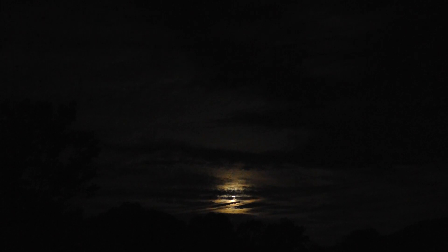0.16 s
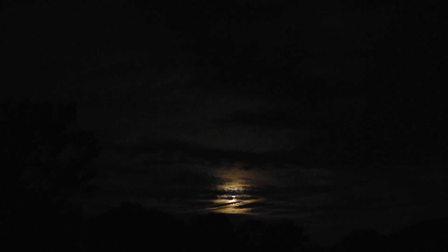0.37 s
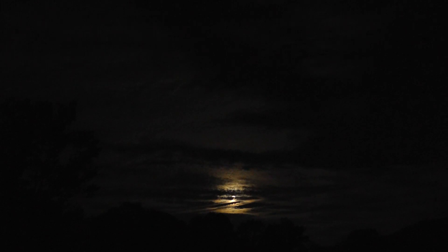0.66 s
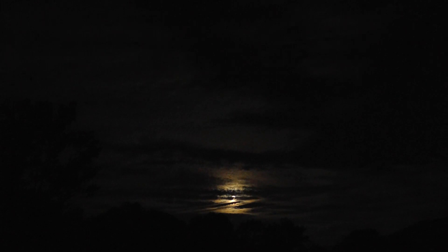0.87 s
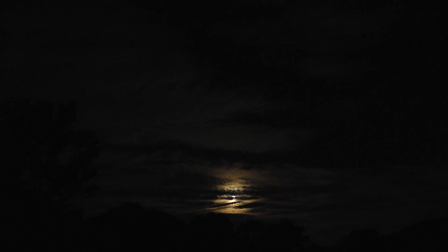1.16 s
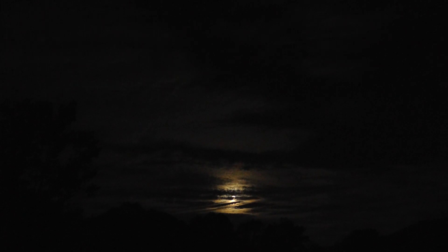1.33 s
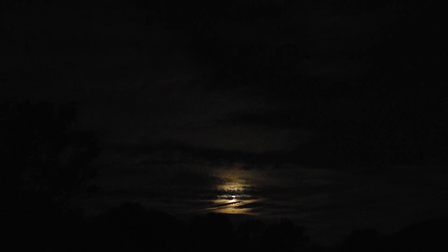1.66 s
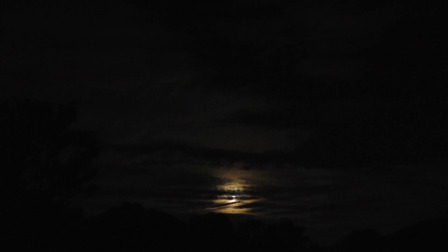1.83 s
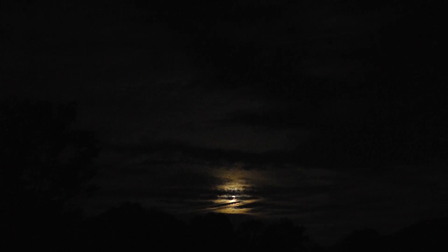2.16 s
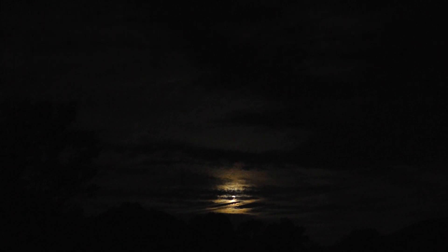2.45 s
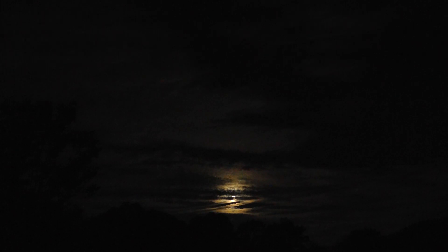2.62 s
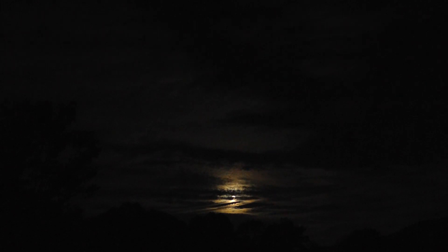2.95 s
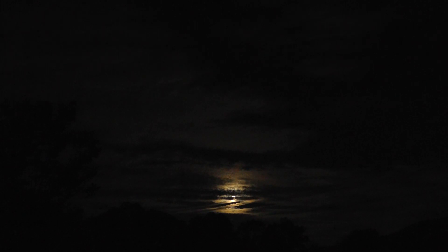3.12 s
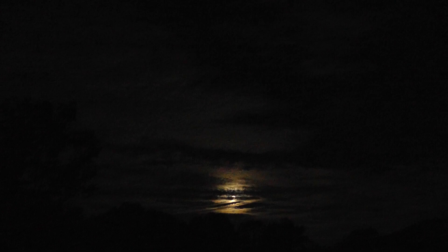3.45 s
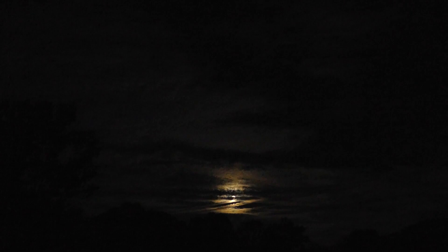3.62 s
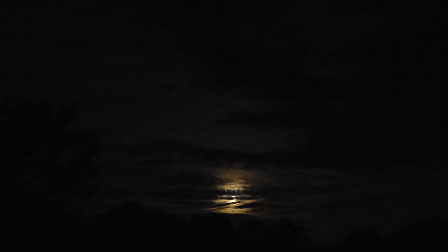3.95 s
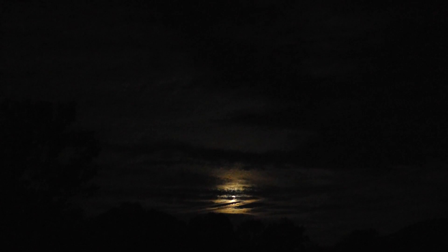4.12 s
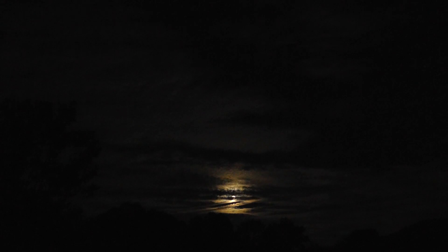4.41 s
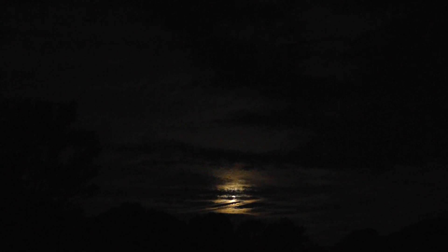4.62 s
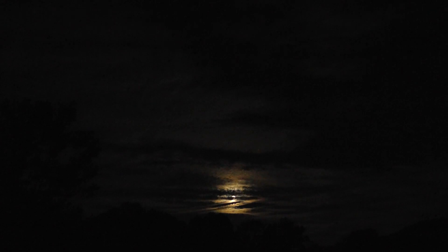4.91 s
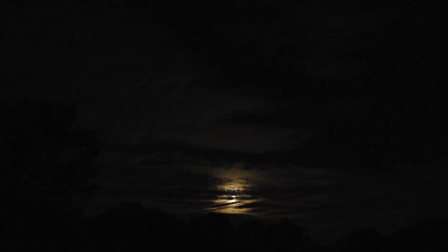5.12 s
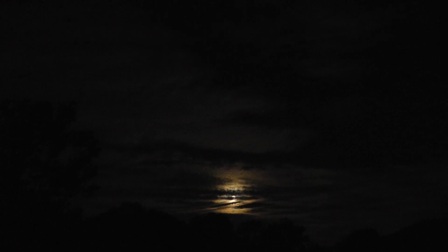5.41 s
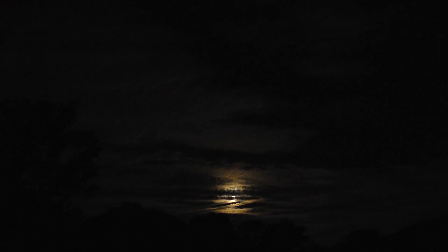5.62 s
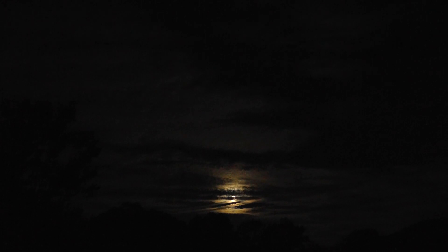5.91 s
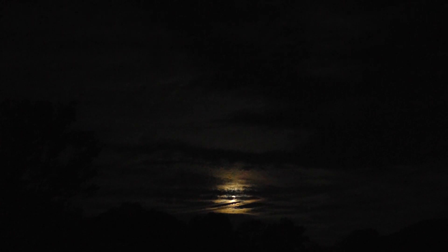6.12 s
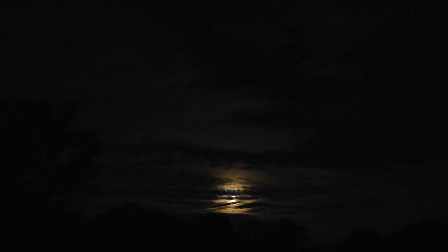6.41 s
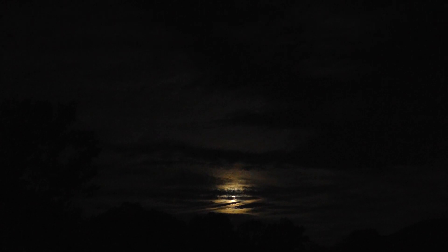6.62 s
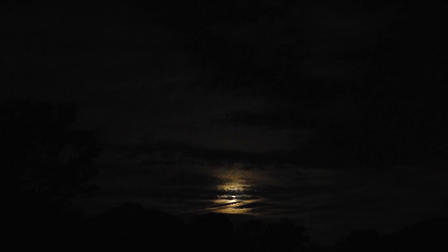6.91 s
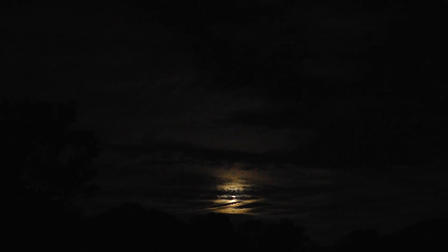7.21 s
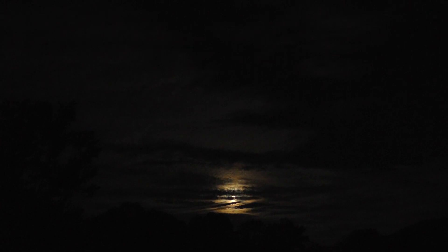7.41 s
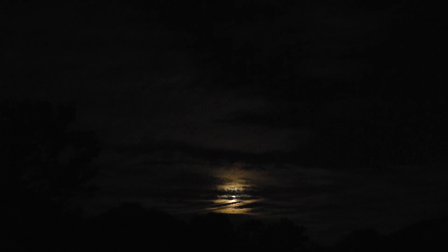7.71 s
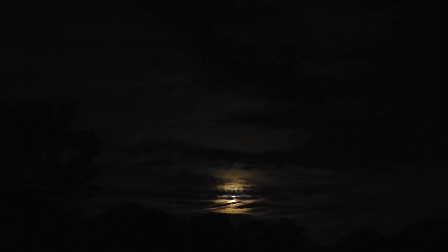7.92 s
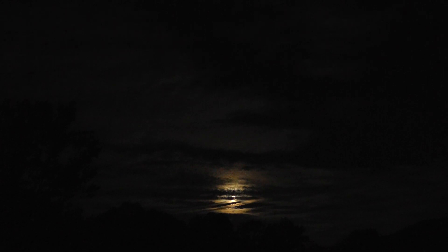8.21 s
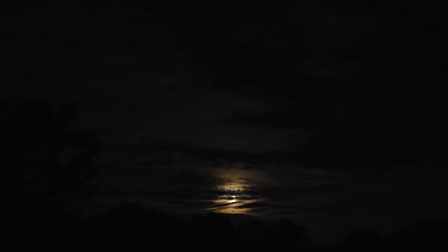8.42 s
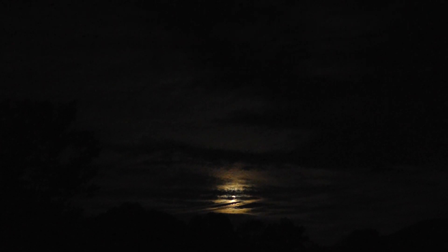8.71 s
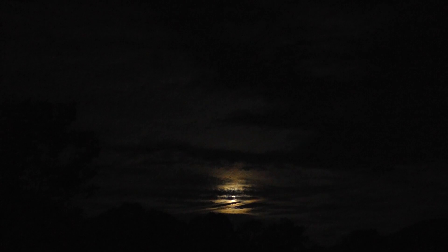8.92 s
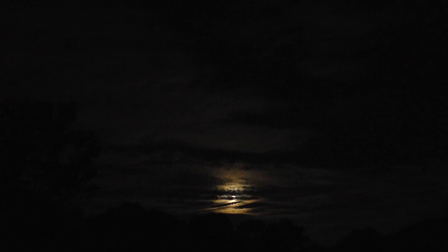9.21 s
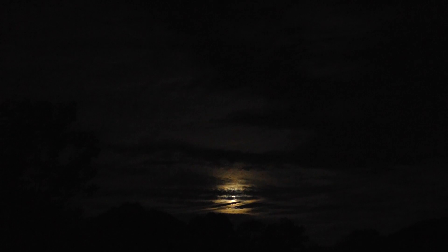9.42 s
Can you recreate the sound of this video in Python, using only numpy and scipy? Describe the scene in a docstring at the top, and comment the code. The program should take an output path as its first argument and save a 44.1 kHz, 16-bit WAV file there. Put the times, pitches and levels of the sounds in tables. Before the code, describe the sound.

Steady layers of distant crickets shimmer from mid-high to very high pitch, with dry katydid buzzing on top. Brief, purring trills from nearer crickets overlap irregularly throughout. One short, far dog bark with a faint echo comes early; from four seconds a brighter, closer buzz thickens the treble. Four quick rasps follow around nine seconds. Dark open field with trees, soft low rumble and faint hum, stationary stereo microphone.

```python
"""Crickets and katydids in a field at night

Five kinds of far crickets, as stroke clicks ringing wing resonances, merge into steady bands; nearer ones
trill in bouts of short gliding tones. Katydids buzz in the treble as noise gated at the stroke rate, one
joining close by, and others rasp in short noise swells. A far dog barks once, with harmonics and throat
noise; a haze of insects, distant traffic and a faint hum are shaped noise and narrow resonances.
"""
import sys
import numpy as np
from scipy import signal
from scipy.fft import rfft, irfft, next_fast_len
from scipy.io import wavfile

SR = 44100
rng = np.random.default_rng(int(sys.argv[2]) if len(sys.argv) > 2 else 0)


def store_wav(level_fs):
    """Save 16-bit WAV to argv[1]."""
    pcm = np.round(np.clip(np.atleast_2d(level_fs), -1, 1) * 32767)
    wavfile.write(sys.argv[1], SR, pcm.T.astype(np.int16))


N = 421596   # samples in the scene

# Spectra below give relative level per Hz. Likeness is left-right correlation: 1 equal, -1 opposed.
# Balances and pans are left-right level differences: positive values favour the left.

# night air and far traffic: spectrum [f/Hz, level/dB]
AIR_SPECTRUM = [(20, -40), (32, -22), (48, -6.5), (60, -1.5), (110, -0.5), (200, 0.5), (400, -2.5),
                (700, -3), (900, -2.5), (1200, -7.5), (1450, -8), (1750, -14.5), (2500, -22)]
# night air and far traffic: course of the level [t/s, level/dB]
AIR_LEVEL_COURSE = [(0, -50.5), (1.7, -50.5), (2.0, -49), (4.0, -49), (5.3, -50.5), (6.45, -49.5),
                    (7.3, -50.5), (9.56, -50.5)]
# night air and far traffic: likeness of the two sides [f/Hz, likeness/1]
AIR_LIKENESS = [(60, 0.16), (130, 0.23), (290, -0.19), (450, -0.39), (750, -0.12), (1200, -0.29),
                (1500, 0.11)]
# night air and far traffic: left-right balance [f/Hz, level difference/dB]
AIR_BALANCE = [(60, -1), (110, -7.0), (200, -5.5), (380, 0.0), (700, -4.5), (1290, -2.5)]
# wavering hum lines [f/Hz, resonance width/Hz, level/dB]
HUM_LINES = [(118.2, 3.2, -63), (170.8, 10.3, -65.5), (237.4, 4.5, -63.5), (334.4, 9.2, -66.5),
             (1820, 1.7, -72.5)]

# countless insects too far to tell apart: spectrum [f/Hz, level/dB]
HAZE_SPECTRUM = [(1700, -24.5), (2000, -7.5), (2520, 1.5), (3050, -12), (3700, -5), (4050, -13),
                 (4450, -4.5), (5350, -2.5), (6500, 3), (8500, -11), (11000, -40)]
# insect haze: likeness of the two sides [f/Hz, likeness/1]
HAZE_SIDE_LIKENESS = [(2000, 0.3), (4000, 0.86), (6500, 1), (8000, 0.084)]
HAZE_DB = -44

# far crickets, one row a kind [f/Hz, pitch spread/Hz, wing resonance width/Hz, stroke rate/(1/s),
# echo share of energy/1, pan/dB, mean level/dB]
FAR_CRICKET_KINDS = [(2178, 57, 90, 45, 0.52, 2, -51), (2802, 68, 124, 55, 0.31, 5, -43.5),
                     (3330, 110, 200, 50, 0.55, 1.5, -53.5), (6015, 182, 310, 60, 0.18, 0.5, -42.5),
                     (4950, 207, 92, 47, 0.2, 1, -50.5)]

# far katydids: wing spectrum [f/Hz, level/dB]
FAR_WING_SPECTRUM = [(7500, -44), (8600, -10.5), (9600, 1), (10300, -1), (11500, 0), (12900, 2.5),
                     (14800, 1.5), (15300, 0.5), (16000, -11)]
# far katydids: course of the level [t/s, level/dB]
FAR_BUZZ_LEVEL = [(0, -48), (2.0, -48.5), (2.4, -49), (4.0, -48.5)]
# lower katydid: wing spectrum [f/Hz, level/dB]
LOW_WING_SPECTRUM = [(6000, -16), (6500, 3), (7000, 4), (7500, 1), (8000, -7), (8600, -43), (9500, -32.5)]
LOW_BUZZ_DB = -52.5
# close katydid: wing spectrum [f/Hz, level/dB]
CLOSE_WING_SPECTRUM = [(8000, -26), (9600, -8), (10500, -13), (11500, -6), (12600, -4), (13500, -1),
                       (14800, -9), (15300, -6), (16000, -18)]
# close katydid, speeding up as it warms [t/s, mean stroke rate/(1/s), level/dB]
CLOSE_BUZZ_COURSE = [(4.04, 146, -80), (4.1, 146, -52), (4.2, 146.2, -46), (4.3, 148, -43), (5.5, 150, -43),
                     (6.5, 151.7, -43), (8.2, 152.2, -42.5), (9.56, 155, -43)]
# close katydid: likeness; sound from the side turns in phase with pitch [f/Hz, likeness/1]
CLOSE_SIDE_LIKENESS = [(8500, -0.98), (13000, -0.58), (14300, -.2), (15500, .4)]

# trill bouts of the nearer crickets, before the scatter between strokes
# [start t/s, length/s, first f/Hz, last f/Hz, level/dB]
TRILL_BOUTS = [(0, 0.24, 4840, 4920, -42), (0.123, 0.72, 5060, 5070, -46), (0.692, .36, 4800, 4800, -43),
               (0.784, 0.22, 4940, 4990, -43), (0.843, 0.216, 5050, 5140, -41),
               (1.155, .25, 4980, 4870, -50), (1.432, 0.34, 4810, 4920, -39.5),
               (1.6, 0.24, 4930, 5120, -46), (1.952, 0.4, 4950, 5000, -47), (2.033, 0.23, 5060, 5130, -43),
               (2.419, 0.26, 4840, 4900, -47), (2.803, 0.41, 4860, 4960, -41.5),
               (3.048, .21, 5100, 5130, -46), (3.391, 0.66, 4810, 4920, -46),
               (3.617, 0.21, 5130, 5110, -47), (4.074, 0.3, 4860, 4850, -41), (4.3, 0.34, 5100, 5090, -41),
               (4.46, .27, 4910, 4890, -43), (5.043, 0.46, 4880, 4900, -48), (5.417, 0.4, 4870, 4850, -42),
               (5.78, .4, 5190, 5050, -42), (5.852, 0.25, 4880, 4900, -40), (6.33, 0.22, 4800, 4810, -47),
               (6.781, 0.4, 5000, 5000, -47), (7.33, 0.27, 5100, 5110, -41.5),
               (7.506, 0.28, 4950, 4830, -42.5), (7.8, 0.3, 4840, 4950, -39), (8.38, 0.3, 4740, 4910, -44),
               (8.599, 0.45, 4960, 5140, -47), (9.12, .22, 5060, 5050, -48), (9.47, .09, 4920, 4940, -46)]
STROKES_PER_S = 53   # mean over the bouts
BOUT_RISE_S, BOUT_STOP_S, BOUT_SWELL_DB = 0.027, 0.034, 2
STROKE_SCATTER_HZ = 55   # full width of the pitch scatter between strokes
STROKE_SAG = 0.037   # share of its pitch that a stroke loses

# rasps [start t/s, length/s, peak level/dB]
RASP_TIMES = [(0.044, 0.81, -47.5), (1.5, 0.35, -54), (1.75, 0.53, -47.5), (8.945, .065, -43),
              (9.015, .065, -43), (9.108, .065, -43.5), (9.184, 0.062, -43)]
# rasps: spectrum [f/Hz, level/dB]
RASP_SPECTRUM = [(6000, -16), (6800, -7), (7700, 4.5), (8200, -3.5), (8800, -10), (9800, -10), (11000, -13),
                 (12500, -30)]

# course of the bark [t/s, fundamental f/Hz, level/dB, overtone level/dB, hoarse noise level/dB]
BARK_COURSE = [(1.785, 343, -66, 2, -20), (1.803, 339, -46, 6, -8), (1.835, 351, -40.5, -4, -2),
               (1.86, 353, -42, -10, -3), (1.872, 352, -48, -6, -5), (1.92, 352, -47, -17, -20),
               (1.95, 351, -62, -16, -20)]
# overtones of the bark [multiple of the fundamental/1, mean level/dB]
BARK_PARTIALS = [(3, -13), (4, 3), (5, -3)]
# echoes of the bark; the delay is for the left side [delay/s, level/dB]
BARK_REFLECTIONS = [(.158, -15), (.24, -22)]

CUTOFF_HZ = 15800   # upper limit of the sound


def from_db(db):
    """Level in decibels converted to amplitude gain."""
    return 10 ** (np.asarray(db) / 20)


def rms_one(x):
    """Normalization to unit rms amplitude."""
    return x / np.sqrt(np.mean(x ** 2) + 1e-20)


def in_time(rows):
    """Linear interpolation of each column of a time table, sample by sample."""
    s, *columns = np.transpose(rows)
    return [np.interp(np.arange(N) / SR, s, column) for column in columns]


def at_hz(points, hz):
    """Linear interpolation of a spectrum table on a logarithmic frequency axis."""
    table = np.array(points)
    return np.interp(np.log(hz), np.log(table[:, 0]), table[:, 1])


def sides(pan_db):
    """Intensity panning: the level difference is split between left and right."""
    return from_db([[pan_db / 2], [-pan_db / 2]])


def drift(points_per_s):
    """Slow random modulation: normal points of unit spread joined by lines."""
    points = rng.standard_normal(400)
    return np.interp(np.arange(N) / SR * points_per_s, np.arange(400), points)


def resonate(x, hz, width_hz):
    """Two equal resonators in cascade: a soft onset and steep skirts."""
    r = np.exp(-np.pi * width_hz / SR)   # pole radius
    section = [1, 0, -1, 1, -2 * r * np.cos(2 * np.pi * hz / SR), r * r]
    return signal.sosfilt([section, section], x + 1e-18)


def stereo_noise(spectrum, alike, balance_db):
    """Mid-side mixing of two noises sets their correlation; a spectrum colours them at unit rms."""
    size = next_fast_len(N)
    hz = np.maximum(np.arange(size // 2 + 1) * SR / size, 1)
    mid, side = rfft(rng.standard_normal((2, size)))
    # likeness and balance may each be one number or a table
    alike = np.clip(at_hz(alike, hz) if np.ndim(alike) else alike, -1, 1)
    tilt = at_hz(balance_db, hz) if np.ndim(balance_db) else balance_db * np.ones(len(hz))
    pair = np.sqrt(1 + alike) * mid + np.sqrt(1 - alike) * side * [[1], [-1]]
    gain = from_db(at_hz(spectrum, hz) + tilt * [[.5], [-.5]])
    return rms_one(irfft(pair * gain, size)[:, :N])


def night_air():
    """Broadband noise of the distance with hum lines, noise in narrow resonances that wavers."""
    white = rng.standard_normal((2, N))
    hum = sum(from_db(db) * rms_one(resonate(white, hz, width_hz)) for hz, width_hz, db in HUM_LINES)
    air = stereo_noise(AIR_SPECTRUM, AIR_LIKENESS, AIR_BALANCE)
    return from_db(in_time(AIR_LEVEL_COURSE)[0]) * air + hum


def insect_haze():
    """Superposition of countless unresolved singers, modelled as steady coloured noise."""
    return from_db(HAZE_DB) * stereo_noise(HAZE_SPECTRUM, HAZE_SIDE_LIKENESS, 1.3)


def wing_strokes(per_s, echo_share, jitter, count):
    """Impulse excitation: direct clicks reach both sides alike, leaf echoes come later and apart."""
    out, echo = np.zeros((2, N)), np.clip(echo_share, 0, 1)
    gains = [np.sqrt(1 - echo)] + [np.sqrt(echo / 3)] * 3   # direct click, three echoes
    for _ in range(count):
        gap, start, size = rng.standard_normal((3, 800))
        pace = per_s * (1 + jitter * start[0])
        at = ((np.cumsum(1 + .04 * gap) - rng.random() - 2) / pace * SR).astype(int)
        lags = rng.integers(100, 900, (2, 3))   # samples
        for ear in range(2):
            for lag, gain in zip([0, *lags[ear]], gains):
                heard = (at + lag >= 0) & (at + lag < N)
                out[ear, at[heard] + lag] += gain * from_db(2.0 * size[heard])
    return out


def far_crickets():
    """Superposed resonators: each kind is a crowd at seven pitches, thickest in the middle, paces unlocked."""
    out = 0
    for hz, spread_hz, width_hz, per_s, echo, pan_db, db in FAR_CRICKET_KINDS:
        crowd = 0
        for step in np.linspace(-1.5, 1.5, 7):
            strokes = wing_strokes(per_s, echo, .08, count=4)
            singers = resonate(strokes, hz + step * spread_hz, width_hz)
            crowd = crowd + from_db(-4.0 * abs(step) ** 1.5) * singers
        out = out + from_db(db + 1.1 * drift(11)) * sides(pan_db) * rms_one(crowd)
    return out


def leaves(x, echo_db, t60):
    """Multipath interference: sparse fixed echoes from still leaves and stems ripple the spectrum."""
    t = np.arange(1000) / SR
    sparse = rng.random(1000) < .04
    echoes = from_db(echo_db - 60 * t / t60) * rng.standard_normal(1000) * sparse
    echoes[0] = 1   # direct sound
    return rms_one(signal.oaconvolve(x, echoes[None])[:, :N])


def buzz(wing, stroke_hz, depths, limp, alike, pan_db):
    """Amplitude modulation: scraping noise gated once a stroke; limp weakens every second stroke."""
    turn = 2 * np.pi * np.cumsum(stroke_hz * (1 + .002 * drift(2))) / SR
    gate = np.cos(turn) + .6 * np.cos(2 * turn + 1.2)
    gate = gate + limp * (np.cos(1.5 * turn) + np.cos(2.5 * turn))
    # depths are the gate's depth on the left and on the right
    return rms_one(np.exp(np.outer(depths, gate)) * stereo_noise(wing, alike, pan_db))


def katydids():
    """Stridulation noise: two far buzzers, a lower one pulsing on the right, a close one from four seconds."""
    far = buzz(FAR_WING_SPECTRUM, 149.3, [.4, .4], .1, 0.2, 0.96)
    far = far + 1.6 * buzz(FAR_WING_SPECTRUM, 145.8, [.2, .2], .1, 0.35, -0.3)
    far = from_db(in_time(FAR_BUZZ_LEVEL)[0]) * leaves(far, -21, .1)
    low = from_db(LOW_BUZZ_DB) * buzz(LOW_WING_SPECTRUM, 188.5, [.2, .5], 0, .3, -5)
    close_pace, close_db = in_time(CLOSE_BUZZ_COURSE)
    close = buzz(CLOSE_WING_SPECTRUM, close_pace, [.3, .35], 0.18, CLOSE_SIDE_LIKENESS, -3.0)
    close = from_db(close_db) * leaves(close, -17, .1)
    return far + low + close


def near_crickets():
    """Tone bursts under a bout envelope: each stroke sags in pitch, the bout glides, leaves echo it."""
    out = np.zeros((2, N + SR))   # room for the last echoes
    for s, length, first_hz, last_hz, db in TRILL_BOUTS:
        t = np.arange(int(length * SR)) / SR
        strokes = t * STROKES_PER_S * rng.normal(1, .01)
        # one random phase, level and pitch for each stroke
        phase, loudness, pitch = rng.random((3, 60))[:, strokes.astype(int)]
        closing = np.clip(strokes % 1 / .75, 0, 1)   # the wing sounds for three quarters of each cycle
        hz = first_hz + (last_hz - first_hz) * t / length + STROKE_SCATTER_HZ * (pitch - .5)
        sagging_hz = hz * (1 + STROKE_SAG * (.55 - closing))
        tone = np.sin(2 * np.pi * (np.cumsum(sagging_hz) / SR + phase))
        edges = np.clip(np.minimum(t / BOUT_RISE_S, (length - t) / BOUT_STOP_S), 0, 1)
        bout = edges * from_db(BOUT_SWELL_DB * t / length)
        stroke = from_db(db + 5.3 * (loudness - 0.68)) * np.sin(np.pi * closing) ** 0.8
        trill = bout * stroke * tone
        at = int(s * SR)
        out[:, at:at + len(t)] += trill
        for ear, lags in enumerate(rng.integers(100, 900, (2, 4))):   # samples
            for lag in lags:
                out[ear, at + lag:at + lag + len(t)] += from_db(-8.5) * trill
    return sides(2.5) * out[:, :N]


def rasps():
    """Noise bursts: each wing scrape has a half-sine envelope; far ones blur into longer swells."""
    shape = np.zeros(N)
    for s, length, db in RASP_TIMES:
        t = np.arange(int(length * SR)) / SR
        scrape = from_db(db) * np.sin(np.pi * t / length)
        at = int(s * SR)
        shape[at:at + len(scrape)] += scrape
    return shape * stereo_noise(RASP_SPECTRUM, 0.46, 2.3)


def dog():
    """Harmonic voice: a strong second partial, throbbing overtones, throat noise and delayed reflections."""
    t = np.arange(N) / SR
    hz, db, overtones_db, hoarse_db = in_time(BARK_COURSE)
    turn = 2 * np.pi * np.cumsum(hz) / SR
    second = from_db(1.6 * drift(44.4)) * np.sin(2 * turn)
    overtones = sum(from_db(level_db + 3.9 * drift(41.2)) * np.sin(k * turn)
                    for k, level_db in BARK_PARTIALS)
    overtones = overtones * (1 + .7 * np.cos(2 * np.pi * 53 * (t - 1.808)))   # throb at 53 Hz
    hoarse = rms_one(resonate(rng.standard_normal(N), 1150, 900))
    voice = second + from_db(overtones_db) * overtones + from_db(hoarse_db) * hoarse
    voice = voice * from_db(db) * (t > BARK_COURSE[0][0]) * (t < BARK_COURSE[-1][0])
    # echoes reach the right side later, by a path 4 % longer
    echoes = [sum(from_db(echo_db) * np.roll(voice, int(s * path * SR)) for s, echo_db in BARK_REFLECTIONS)
              for path in (1, 1.04)]
    direct = np.array([voice, np.roll(voice, 12)]) * sides(-1.5)   # right side 12 samples later
    return direct + echoes


def scene():
    """Linear superposition of all layers of the night."""
    background = night_air() + insect_haze()
    insects = far_crickets() + katydids() + near_crickets() + rasps()
    return background + insects + dog()


def record(dry):
    """Band limitation: the deepest bass is thinned, and nothing is heard above the upper limit."""
    bass_cut = signal.butter(2, 40, "high", fs=SR, output="sos")
    top_cut = signal.ellip(16, .5, 75, CUTOFF_HZ, fs=SR, output="sos")
    return signal.sosfilt(top_cut, signal.sosfilt(bass_cut, dry))


dry = scene()
out = record(dry)
store_wav(out)
```